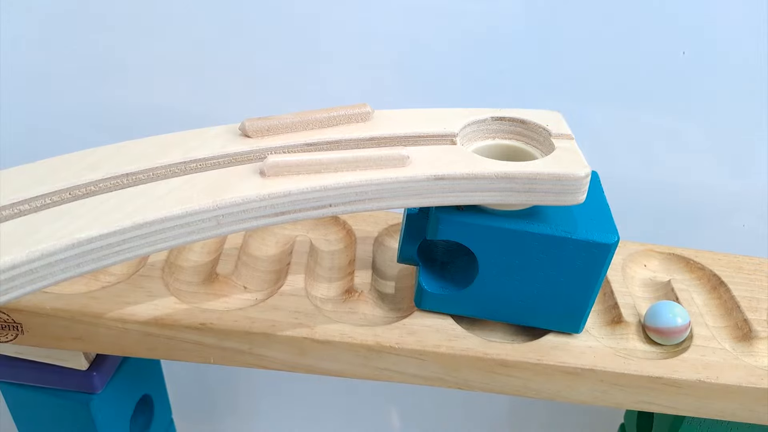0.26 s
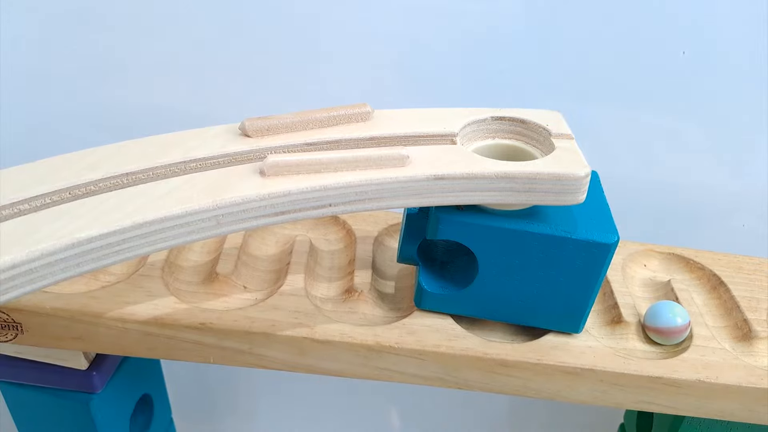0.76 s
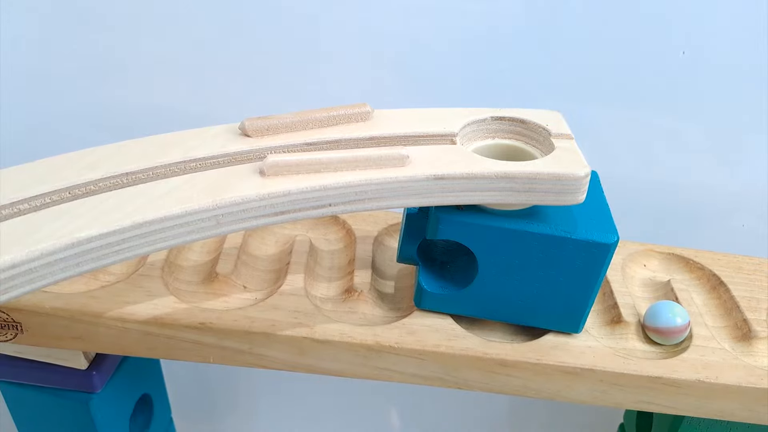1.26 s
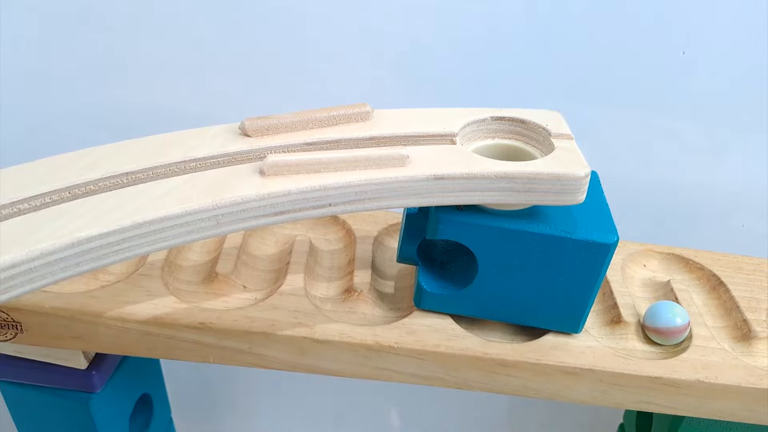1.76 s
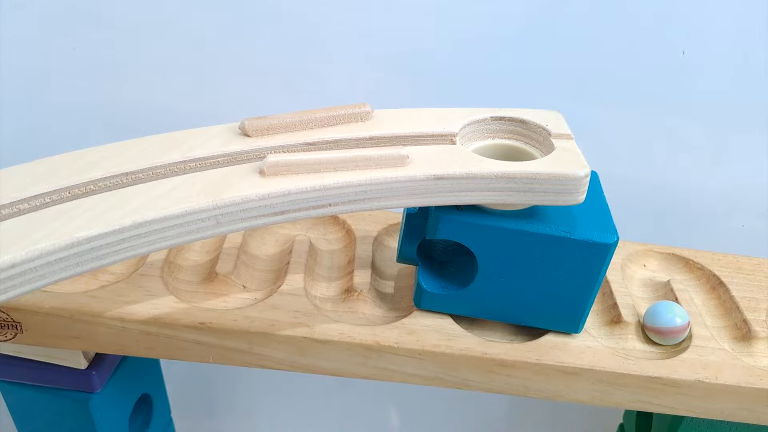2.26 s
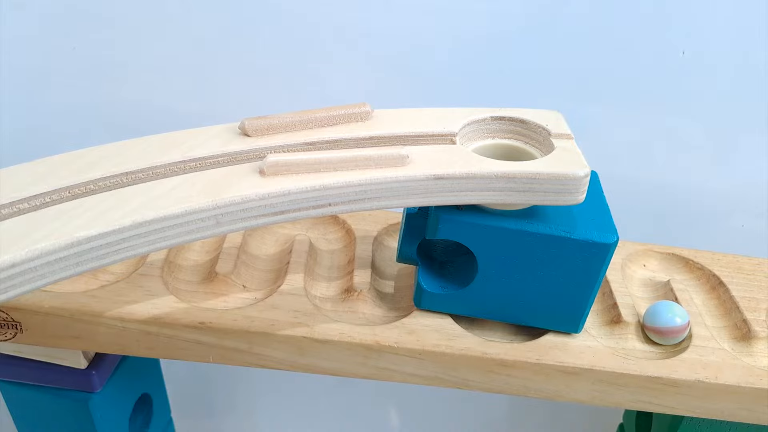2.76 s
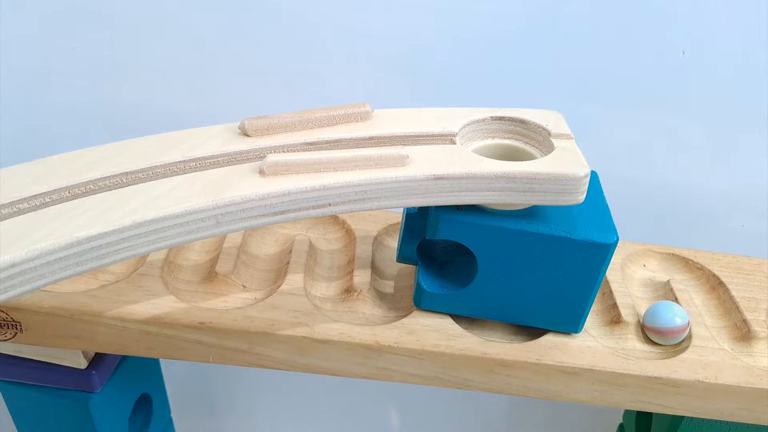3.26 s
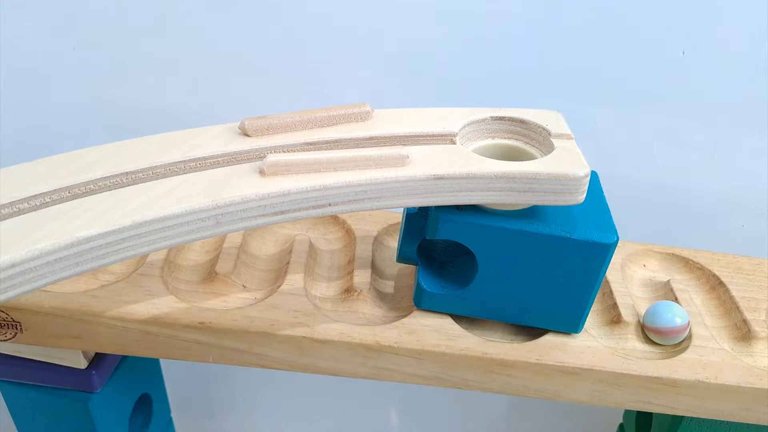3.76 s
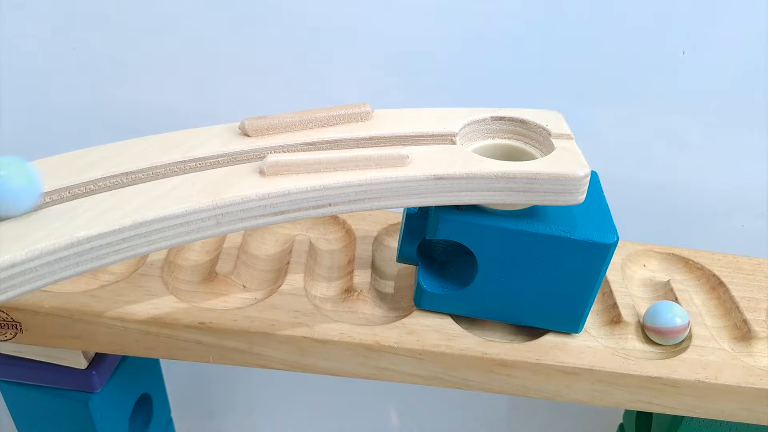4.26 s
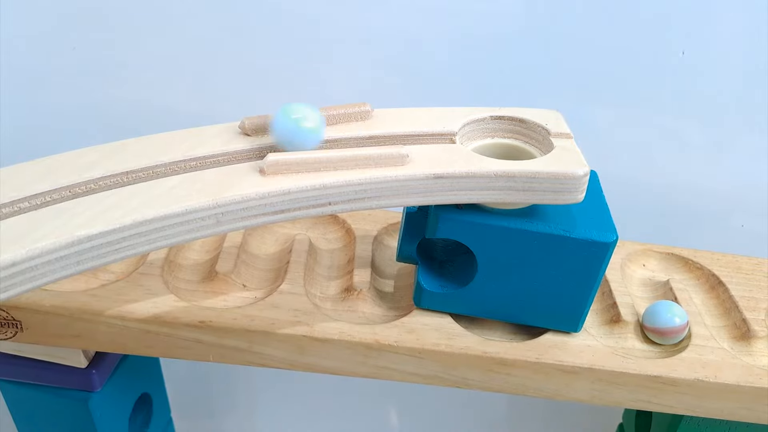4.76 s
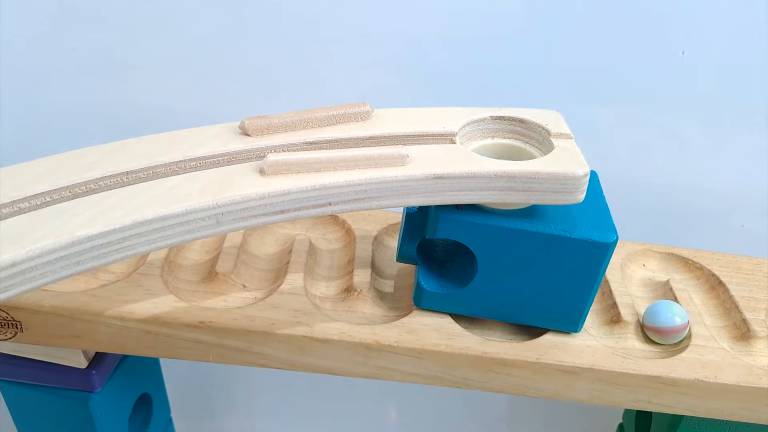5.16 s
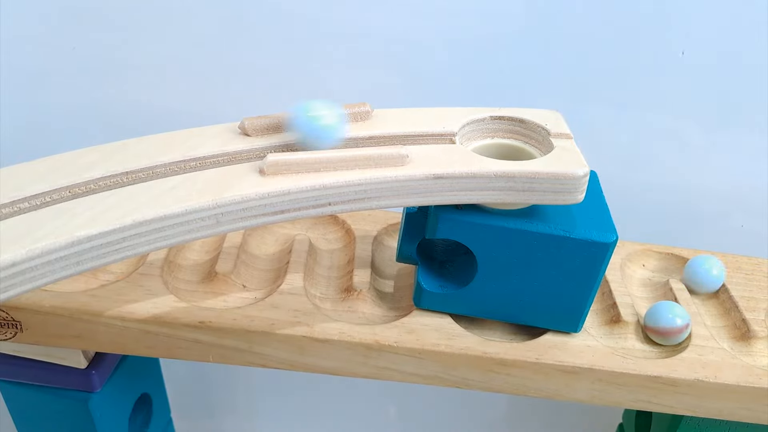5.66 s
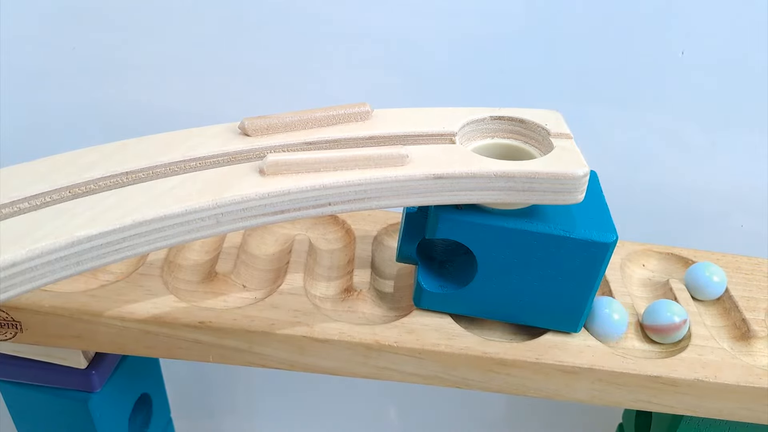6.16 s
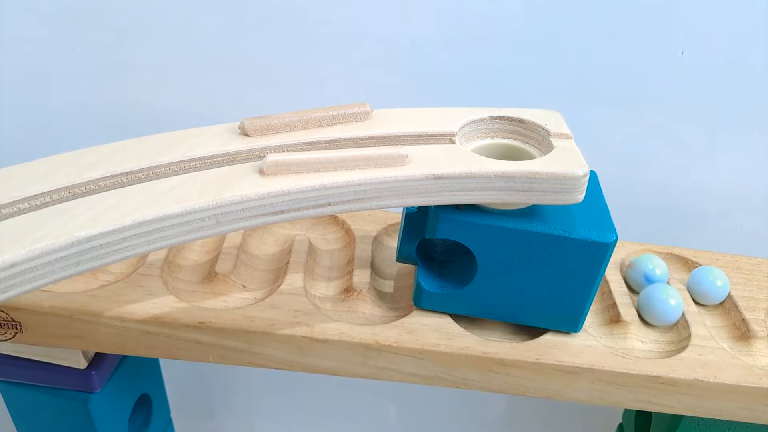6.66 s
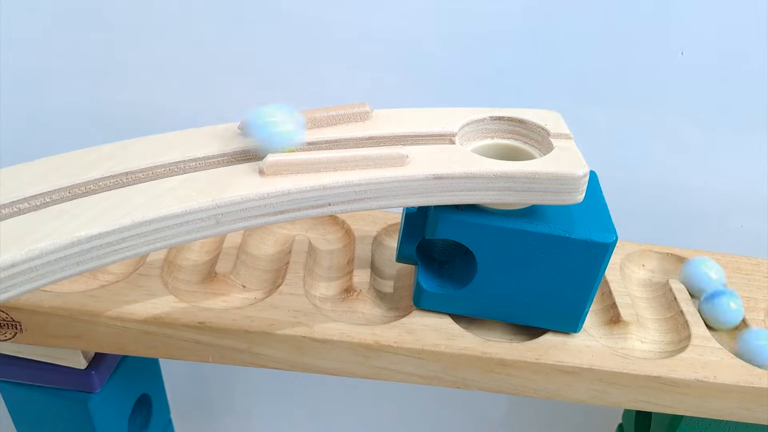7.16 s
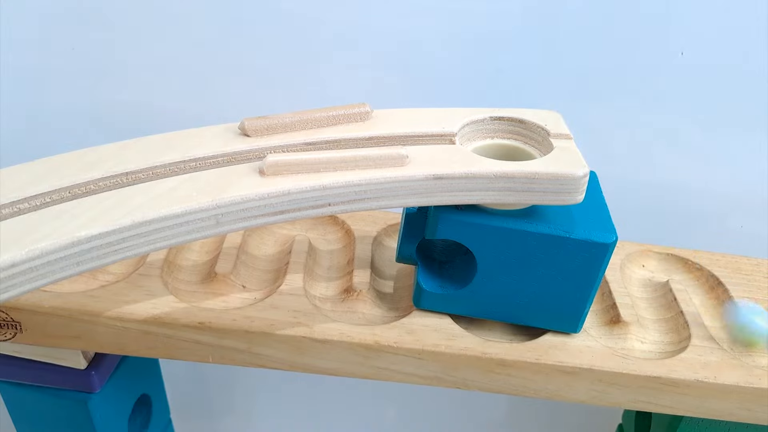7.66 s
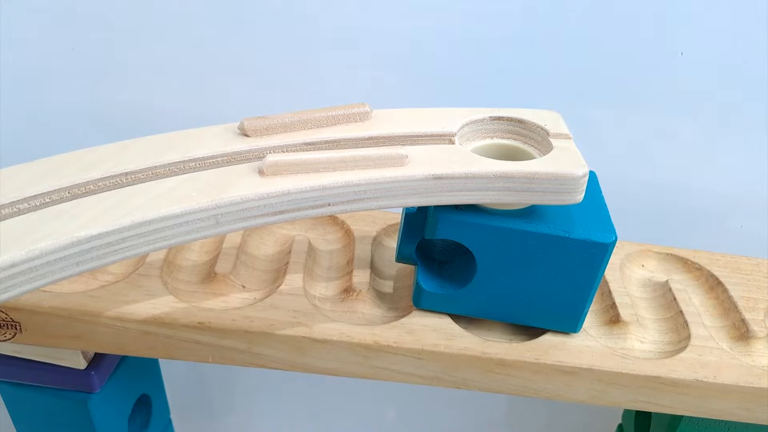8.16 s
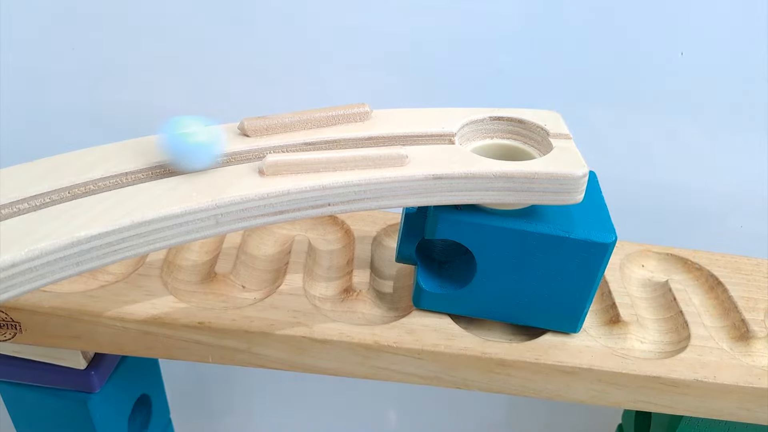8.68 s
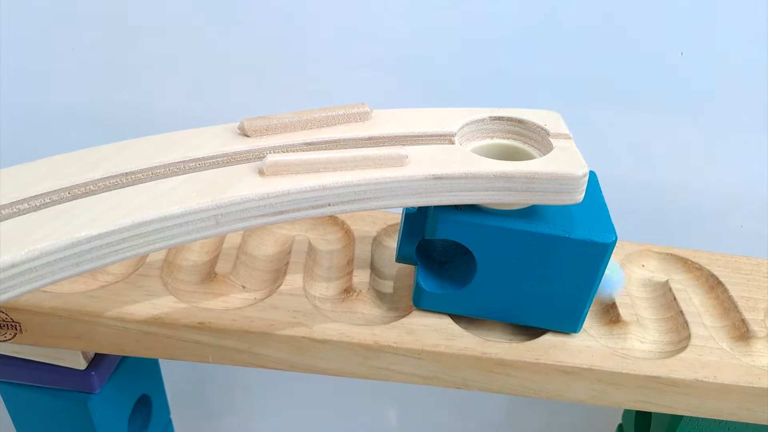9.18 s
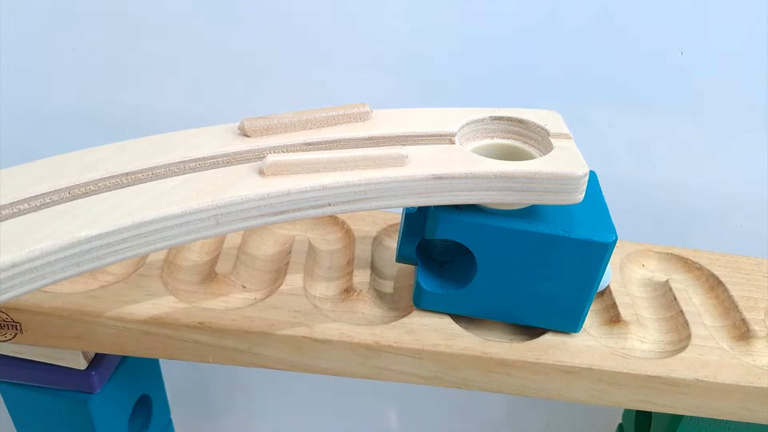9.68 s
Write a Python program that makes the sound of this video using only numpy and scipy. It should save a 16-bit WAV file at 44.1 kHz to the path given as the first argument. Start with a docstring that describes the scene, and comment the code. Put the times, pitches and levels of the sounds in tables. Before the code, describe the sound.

Bright wooden knocks, glassy clacks and grainy rolling from marbles on a wooden track, building from sparse taps to a dense rattling zigzag run.

```python
"""Sharp wooden knocks and glassy clacks, with patter between them: glass marbles run down a wooden
marble run close to a phone in a small room. Each knock rings the part it strikes, thumps the frame and ticks.
Rolling is a dense patter of tiny bumps into the same parts. Thin glass rings, two dull thuds and a short
room tail join in, over a faint hum and a low wavering drone."""
import sys
import numpy as np
from scipy import signal
from scipy.fft import rfft, irfft
from scipy.io import wavfile
from scipy.ndimage import uniform_filter1d

SR = 44100
rng = np.random.default_rng(int(sys.argv[2]) if len(sys.argv) > 2 else 0)


def generate_wav(signal):
    """Clip the signal to [-1, 1] and save it as 16-bit WAV at the path in sys.argv[1]."""
    frames = np.transpose(np.atleast_2d(signal))
    scaled = np.clip(frames, -1, 1) * 32767
    pcm = np.round(scaled).astype(np.int16)
    wavfile.write(sys.argv[1], SR, pcm)


N = 437472
T = np.arange(6144) / SR  # time axis of one blow, in seconds
LOW_HZ, MID_HZ, HIGH_HZ = 700, 1800, 4200  # borders between thump, body, ring and tick
PORT_GAP_S = 0.000423  # longest delay between the phone's two microphone ports

# The wooden parts and the heap of marbles. Each holds three things: its modes (the tones it rings with),
# the colour of its crack, and how far the crack stands over the modes in dB, before each layer's own offset.
# Each mode row: pitch in Hz, width in Hz (before sharpening), strength in dB (before scaling by width).
# Each crack row: pitch in Hz, strength in dB per Hz.
TRAY = ([(1150, 70, 3), (1310, 67, 3), (1510, 70, 4), (1740, 80, 2), (1970, 80, 1), (2080, 680, -9.5),
        (2210, 43, -22), (2666, 210, -1), (4530, 60, -29)], [(41, -37.5), (72, -16), (112, 13), (162, -13),
        (223, 13), (2540, 1), (5750, -10.5), (11400, -13), (16000, -33)], 0.68)
HEAP = ([(757, 260, -2), (931, 260, -0.5), (1250, 86, -6), (1600, 170, -9), (2690, 270, -15.5),
        (4820, 150, 6.5), (6755, 233, 6), (7940, 110, -15.5), (11200, 467, -8), (11500, 440, -19.5)],
        [(41, -53), (70, -22), (431, -4.5), (506, -3.5), (744, 1), (2370, -29.5), (6900, -16),
        (11600, -14.5), (16000, -30)], -1.3)
RAMP = ([(1080, 89, 5), (2472, 140, -11), (4890, 5000, -24)], [(41, -36), (70, -18), (344, -4.5),
        (506, -14.5), (744, -9), (892, -19), (2600, -16.5), (3910, -26.5), (11600, -36), (16000, -61)], 2)
BLOCK = ([(815, 150, -4.5), (1780, 50, -3.5), (3450, 90, -12), (5140, 70, -16), (2190, 230, -17),
         (2860, 160, 0), (3094, 68, -5), (4160, 23, -57), (4930, 460, -22), (4660, 110, -11.5),
         (6010, 64, -14), (7020, 97, -18), (7900, 33, -47)], [(41, -34), (70, -28.5), (108, 4), (431, 5),
         (529, -8.5), (779, 13), (2270, -25.5), (2840, -17), (11000, -29), (16000, -39)], -4)
ZIGZAG = ([(750, 43, 3), (1258, 21, 17), (1772, 25, 4), (2012, 23, 6), (2342, 28, 11.5), (2640, 14, 12.5),
          (2850, 32, 6), (3216, 29, 13.5), (4034, 67, 1), (4710, 54, 0), (6200, 59, -32), (6700, 26, -36),
          (8160, 34, -40)], [(41, -15), (72, 5), (122, 19), (1020, -18), (1250, -6), (1510, -20),
          (3190, -11), (11100, -26.5), (16000, -60)], -1)

# Where the marbles are. Each row: start in seconds, part they run on.
ROUTE = [(0, TRAY), (1.03, HEAP), (2.17, TRAY), (2.9, RAMP), (5.14, BLOCK), (6.42, RAMP), (7.4, BLOCK),
         (7.82, ZIGZAG), (9.0, BLOCK), (9.34, TRAY)]

# How each stretch of the route sounds. Each row: basic knock decay in seconds, left minus right in dB,
# bearing from -1 (right) to 1 (left), spread of bump sizes in dB, scatter of rolling modes in dB.
STRETCHES = [(0.048, -0.5, .2, 1, 1.5), (0.08, 0, .7, 3, 2.5), (0.11, -0.5, .9, 2.5, 0),
             (0.09, 0, .5, 2.2, 2), (0.062, -1, .6, 2.5, 1), (0.058, -0.5, .8, 2, 2.5),
             (0.11, -2, -.9, 3.5, 1.5), (0.07, -2.5, -.6, 2.5, 4.5), (0.066, -1.5, -.9, 3, 5.5),
             (0.093, -1.5, .1, 1.5, 0.5)]


def undb(db):
    """Turn decibels into a plain gain."""
    return 10 ** (np.asarray(db) / 20)


def rms(x):
    """Average strength of a signal."""
    return np.sqrt(np.mean(x ** 2))


def colour(x, points):
    """Shape the spectrum along the last axis by (Hz, dB) points."""
    hz, db = np.transpose(points)
    f = np.arange(x.shape[-1] // 2 + 1) * SR / x.shape[-1] + 1  # 1 Hz up, so that the log exists
    gain = undb(np.interp(np.log(f), np.log(hz), db))
    return irfft(rfft(x) * gain, x.shape[-1])


def fade(t60):
    """Die away by 60 dB in t60 seconds."""
    return np.exp(-np.log(1000) * T / t60)


def stretch_at(s):
    """Number of the stretch of the route at s seconds."""
    return np.searchsorted([start for start, _ in ROUTE], s, "right") - 1


def part_at(s):
    """The part the marbles run on at s seconds."""
    return ROUTE[stretch_at(s)][1]


def hum():
    """Still air and distant machines: coloured noise, its bass nearly alike at both ports."""
    # Each row: pitch in Hz, strength in dB per Hz.
    hum_colour = [(15, -50.5), (25, -17), (102, 2.5), (190, -23), (503, -18), (818, -2.5), (2050, -25),
                  (3160, -50.5), (11600, -42.5), (16000, -83.5)]
    mid_db = -56  # level of what both ports share
    mid, side = colour(rng.standard_normal((2, N)), hum_colour)
    side = colour(side, [(60, -17.5), (500, -2.5), (1500, -3.0)])
    return undb(mid_db) * np.array([mid + side, mid - side]) / rms(mid)


def drone():
    """A low wavering drone through the floor: noise squeezed into a narrow band near 48 Hz."""
    # Each row: time in seconds, level in dB.
    drone_levels = [(0, -60), (1, -57), (1.6, -63), (2.5, -66), (3.1, -57), (3.6, -54), (5, -53),
                    (7.9, -57), (9.2, -57), (9.92, -66)]
    x = colour(rng.standard_normal(N),
               [(25, -33.0), (40, -16.0), (48, 23.0), (56, -13.5), (80, -31.0), (200, -73.0)])
    level_db = np.interp(np.arange(N) / SR, *np.transpose(drone_levels))
    return undb(level_db) * x / rms(x)


def room(x):
    """A diffuse tail that builds within a few milliseconds; the treble dies first."""
    t60_s, treble_t60_s = 0.37, 0.22
    t = np.arange(int(.45 * SR)) / SR
    noise = rng.standard_normal((3, len(t)))
    low = signal.sosfilt(signal.butter(1, 1500, fs=SR, output="sos"), noise)
    bass = signal.sosfilt(signal.butter(1, 250, fs=SR, output="sos"), noise)
    slow = low - bass + .55 * bass[2]  # both ports get the same bass
    tail = slow * 1000 ** (-t / t60_s) + (noise - low) * 1000 ** (-t / treble_t60_s)
    tail = tail[:2] * (1 - np.exp(-t / 0.002))
    tail = tail / np.linalg.norm(tail, axis=1, keepdims=True)
    return signal.fftconvolve(x, tail, axes=1)[:, :N]


def glass():
    """A marble touched by another sings on thinly: a pure tone that fades."""
    # Each row: start in seconds, pitch in Hz, peak level in dB, time to fade by 60 dB in seconds.
    glass_rings = [(0.001, 5460, -57, .18), (0.001, 9900, -68, .2), (0.078, 4680, -52, .35)]
    t = np.arange(N) / SR
    out = np.zeros(N)
    for s, hz, db, t60 in glass_rings:
        envelope = (t > s) * 1000 ** (-np.abs(t - s) / t60)
        out += undb(db) * envelope * np.sin(2 * np.pi * hz * t)
    return out


def thuds():
    """A marble lands softly on solid wood: a few low cycles, gone at once."""
    # Each row: start in seconds, pitch in Hz, level in dB (before doubling and the soft start),
    # time to fade by 60 dB in seconds.
    thud_table = [(3.26, 420, -15, .02), (9.222, 600, -20, .03)]
    out = np.zeros(N + len(T))
    for s, hz, db, t60 in thud_table:
        i = int(s * SR)
        envelope = (1 - np.exp(-T / .0015)) * fade(t60)
        out[i:i + len(T)] += 2 * undb(db) * envelope * np.sin(2 * np.pi * hz * T)
    return out[:N]


def modes(table, bearing, sharp, scatter_db, spread=.3):
    """One blow on a table of modes; each fading tone reaches the two ports from its own spot."""
    hz, width, db = np.array(table, float).T[:, :, None]
    gain, detune, start, spot = rng.standard_normal((4, len(table), 1))
    f = hz + (0.22 * width + .005 * hz) * detune
    # a wide mode dies fast; a higher "sharp" makes every mode last longer
    ring = undb(db + scatter_db * gain) * width * np.exp(-np.pi * width / sharp * T)
    lag = np.pi * f * PORT_GAP_S * np.clip(bearing + spread * spot, -1, 1)
    return np.array([np.sum(ring * np.sin(2 * np.pi * f * T + 2 * start + side * lag), axis=0)
                     for side in (1, -1)])


def blow(part, spot, bright_db, bearing, t60, sharp, scatter_db):
    """Ring, thump, body and tick of one blow: clear modes over a crack of countless short ones."""
    # The wooden frame's modes. Each row: pitch in Hz, width in Hz (before sharpening),
    # strength in dB (before scaling by width).
    frame_modes = [(88, 45, -15), (116, 16, -1), (185, 18, -.6), (260, 24, -2.5), (352.3, 72, 1),
                   (439.4, 31, 1), (600, 110, -3)]
    table, outline, crack_db = part
    if spot:  # modes far from the pitch of the struck spot sound slightly weaker, by up to about 2 dB
        ping_hz = spot[0][0]
        table = [(f, width, db - 1.4 * min(abs(np.log2(f / ping_hz)), 1.5)) for f, width, db in table]
    own = modes(table, bearing, sharp, scatter_db)
    if spot:  # the ping arrives nearly in step at both ports
        own = own + modes(spot, .08 * bearing, sharp, scatter_db=1.0, spread=0.12)
    frame = modes(frame_modes, 0.65 * bearing, 0.79, scatter_db)

    outline = [(f, db + bright_db * max(np.log2(f / HIGH_HZ), 0)) for f, db in outline]
    noise = colour(rng.standard_normal((2, len(T))), outline)
    fizz = noise.copy()  # the treble of the crack differs between the ports
    share = .85  # much of the rest reaches both ports, one after the other
    delayed = np.roll(noise[0], int(bearing * PORT_GAP_S * SR))
    noise[1] = share * delayed + np.sqrt(1 - share ** 2) * noise[1]

    # Each row: band edges in Hz, clear modes, crack, factor on the decay, rise in seconds
    # (before softening), extra crack in dB. The thump comes late and stays; the tick is short.
    layers = [
        ([MID_HZ, HIGH_HZ], own, noise, 0.67, 0.00096, -1.5),  # ring
        ([70, LOW_HZ], frame, noise[:1], 1.66, 0.0048, -4),  # thump, with one crack for both ports
        ([LOW_HZ, MID_HZ], own, noise, 1.5, 0.0013, -1.5),  # body
        ([HIGH_HZ, 17000], own, fizz, 0.65, 0.00073, -1.5 + 0.89 * max(bright_db, 0)),  # tick
    ]
    soft = (t60 / 0.039) ** 0.33  # a glancing blow that lasts longer also starts more gently
    out = []
    for edges, clear, crack, stay, rise_s, more_db in layers:
        band = signal.butter(3, edges, "band", fs=SR, output="sos")
        clear = signal.sosfilt(band, clear)
        crack = signal.sosfilt(band, crack * fade(stay * t60))
        mix = clear / rms(clear) + undb(crack_db + more_db) * crack / rms(crack)
        out.append(mix * (1 - np.exp(-T / (rise_s * soft))))
    return out


def roll_levels():
    """Gains of ring, rumble, body and hiss: every spell rises, swells or sinks evenly, and dies away."""
    # Each row: start and end in seconds, then levels in dB at mid-spell of ring, frame rumble,
    # body and hiss, then the swell from start to end in dB.
    spells = [(0, 0.214, -55, -53.5, -53.5, -61, 3), (0.71, 1.0, -33, -45, -30, -38, 3),
              (1.045, 1.15, -30, -42, -27, -29, -2), (1.39, 1.545, -35, -46, -28, -36, -6),
              (1.58, 1.79, -27, -38, -23.5, -25, 0), (1.81, 1.9, -30, -42, -26, -28, -5),
              (1.9, 2.086, -54, -53.5, -48, -48.5, -23), (2.506, 2.754, -74, -58, -60, -85.5, 2),
              (2.998, 3.506, -59, -44, -46, -83.5, -4), (3.522, 3.95, -72.5, -46.5, -58, -77.5, -2),
              (4.05, 4.38, -70, -47, -55, -78, 5), (4.44, 4.82, -72, -46.5, -57, -78, -2),
              (4.85, 5.17, -50.5, -36, -44, -69, -1.5), (5.215, 5.662, -60.5, -36.5, -46, -62, -5),
              (5.698, 6.21, -54, -40.5, -47, -68, 4), (6.482, 7.423, -54, -40, -46, -70, 2.5),
              (7.522, 7.806, -32, -30.5, -31, -40, -5), (7.86, 8.59, -34, -37, -37, -49, -3.5),
              (8.638, 9, -35, -39.5, -34.5, -50, 2), (9.01, 9.438, -33, -32.5, -40.5, -49.5, 9),
              (9.56, 9.916, -35, -41.5, -34, -49, -8)]
    rise_db_per_s, fall_db_per_s = 498.5, 247.5
    t = np.arange(0, N + 64, 64) / SR  # a coarse time grid is enough
    power = 0
    for start, stop, *layers_db, swell_db in spells:
        shape_db = swell_db * (np.clip((t - start) / (stop - start), 0, 1) - .5)
        shape_db = shape_db - rise_db_per_s * np.maximum(start - t, 0)
        shape_db = shape_db - fall_db_per_s * np.maximum(t - stop, 0)
        power = power + undb(np.add.outer(layers_db, np.maximum(shape_db, -200))) ** 2
    return np.array([np.interp(np.arange(N) / SR, t, gain) for gain in np.sqrt(power)])


def rolling(per_s, stretch_s):
    """Tiny bumps in the grain of the wood; the ringing changes as a marble moves along."""
    levels = roll_levels()
    grit_db = np.array(STRETCHES)[stretch_at(np.arange(N) / SR), 3]
    size = undb(grit_db * np.minimum(rng.exponential(size=N), 4))
    size /= np.sqrt(uniform_filter1d(size ** 2, SR // 4))  # even out the slow changes in strength
    bumps = (rng.random(N) < per_s / SR) * rng.standard_normal(N) * size

    hold = int(.018 * SR)  # the marble skips over rough and smooth patches
    patches = np.repeat(rng.standard_normal(N // hold + 1), hold)
    bumps *= undb(1.5 * uniform_filter1d(patches, hold // 2)[:N])

    # cut the bumps into overlapping pieces; each piece strikes a freshly drawn blow
    step = int(stretch_s * SR)
    pushes = np.pad(bumps / rms(bumps) * levels, ((0, 0), (step, 2 * step)))
    blend = np.sin(np.pi * np.arange(2 * step) / (2 * step))
    out = np.zeros((2, N + len(T) + 3 * step))
    for i in range(0, N + step, step):
        s = min(i, N - 1) / SR
        _, _, bearing, _, scatter_db = STRETCHES[stretch_at(s)]
        layers = blow(part_at(s), [], 0, bearing, t60=0.014, sharp=0.5, scatter_db=scatter_db)
        for x, push in zip(layers, pushes):
            piece = (push[i:i + 2 * step] * blend)[None]
            y = signal.fftconvolve(piece, x / rms(x) / np.sqrt(len(T)), axes=1)
            out[:, i:i + y.shape[1]] += y
    return out[:, step:N + step]


def knocks():
    """Marbles drop, bounce and clack; the struck spot adds a short ping of its own."""
    # Each row: start in seconds, ring level in dB, then thump, body and tick in dB compared with
    # the ring, then the pitch of the ping in Hz and, on some, of a second ping in Hz.
    knock_table = [(0.078, -46, -8, -2, 2, 4610), (0.0925, -12, -18.5, -1.5, -12, 1740, 1150),
                   (0.256, -64, 0, 0, 9, 6000), (0.326, -56, 18, 18, -22, 818),
                   (0.397, -8.5, -21.5, -4.5, -15, 1730, 2630), (0.5908, -7, -25, -5, -19.5, 2560, 1500),
                   (0.6995, -13.5, -38, -7.5, -41, 2060, 2680), (0.7251, -8, -24.5, -9.5, -29, 2450, 1520),
                   (0.77, -26, -20, 2, -6, 1600), (0.815, -8, -25, -6.5, -17, 2600, 1500),
                   (0.8854, -10.5, -21, -3.5, -14.5, 1910), (0.894, -24, -20, -4, 0, 4400),
                   (0.921, -30, -20, -4, 6, 4900), (0.9412, -15.5, -35, -4, -12, 1480),
                   (0.9858, -18, -36, -10, -31, 2000), (1.0186, -17, -31, -7, -32, 2500),
                   (1.0368, -22, -33, -4, 0.5, 4800), (1.06, -28, -25, -4, 5, 4500),
                   (1.0926, -20, -4, 4.5, -8, 915), (1.165, -32, -8, 8, -4, 880),
                   (1.239, -51, 2, 15, 16, 790), (1.2742, -35, -7.5, 3, 5.5, 905),
                   (1.3715, -34, -12, 3, -13, 2540), (1.3862, -30, -26, 8, 7, 990),
                   (1.4151, -29.5, -8, 3.5, -5, 880), (1.4448, -34, -8, 0, 1, 969),
                   (1.462, -29.5, -1, 10, 4, 802), (1.477, -27.5, -10, -1, -1, 930),
                   (1.4964, -30, -4, 10, 0, 905), (1.5585, -19, -25, -2, 8, 6800, 900),
                   (1.588, -24, -22, -1, 11, 4660), (1.6051, -17, -15, -2, 6, 830),
                   (1.6463, -31, -14, 0, 9, 4600), (1.6732, -27, -14, 7, 11, 740),
                   (1.696, -29, -20, 13, 7, 760), (1.724, -27.5, -10, 10, 2, 800),
                   (1.7645, -30, -18, 6, 8, 4710), (1.7864, -22, -9, 3.5, 5, 6700),
                   (1.8327, -23, -24, 5, 1, 4710), (1.8643, -32, -17, 8, 2, 961),
                   (1.898, -32, -14, 1, 2, 900), (1.9896, -45.5, -6, 12, 7, 1690),
                   (2.1514, -65.5, 3, 7, 11, 975), (2.1961, -51.5, -4, 11, -13, 1430),
                   (2.2361, -52.5, -9, -0.5, -23, 1530), (2.255, -51, -4, 7, -3.5, 810),
                   (2.333, -56, -2, 6, -12, 1400), (2.415, -58, -2, 7, -15, 1300),
                   (2.5172, -27, -11.5, -6, -17, 2480), (2.585, -40, 0.5, -10, -15, 2320),
                   (2.7366, -44, 5, -1, -19.5, 960), (2.755, -39.5, -8, -1, -10, 2770, 4700),
                   (2.7789, -44, 2, -7, -27, 970), (3.005, -60, 0.5, 3, -18.5, 1600),
                   (3.0471, -54.5, 4, 4, -20, 1800), (3.077, -48, 0, 6, -24, 2100),
                   (3.1418, -50, -2, 5, -18, 1900), (3.1763, -50.5, 0.5, 5, -24, 2380),
                   (3.2048, -48, 2, 6, -25, 1700), (3.2581, -46, 6, 12, -20, 900),
                   (3.2695, -26, -18, 1, -22, 1750, 1020), (3.279, -29, -18, -3, -24, 2420, 1850),
                   (3.287, -30, -16, -2, -22, 2400), (3.295, -32, -8, -1, -26, 1720),
                   (3.4721, -54, 0, 0, -9, 2700), (3.5083, -31, -11, -24, 13, 5010),
                   (3.6066, -31.5, -19, -22, -4, 2600), (3.6299, -27.5, -10.5, -20, -11, 2770),
                   (3.648, -45, -7, -12, -1, 2370), (3.741, -33, -1.5, -6, -17, 3040),
                   (3.7763, -36.5, -2, 0, -14, 802), (3.8005, -38.5, 4.5, 0.5, -10.5, 980),
                   (4.401, -43.5, -8, 6, -24.5, 970), (4.5118, -51, -3.5, 9, -20, 840),
                   (4.536, -48.5, -1, 2.5, -21, 855), (4.8528, -50.5, 3, -2, -16, 1200),
                   (5.1521, -21, -13.5, -13, -12, 2470), (5.1711, -11.5, -6, -7, -9, 2840, 750),
                   (5.1817, -12.5, -7.5, -21, -0.5, 3410), (5.2052, -23.5, 2, -3, -15, 818),
                   (5.2649, -14, -2.5, -18, -4, 5130), (5.2802, -24, -14, -6, -13, 2370),
                   (5.3246, -24, 3, -13, -7, 810), (5.3705, -7.5, -14.5, -24, -14, 2900, 3150),
                   (5.447, -9.5, -13, -26, -18, 2950, 3200), (5.5072, -7, -14, -6, -16, 2800, 3600),
                   (5.5662, -17, -6.5, -2.5, -17, 2780, 3630), (5.6261, -34, -2, 7, -32, 806),
                   (5.6893, -29.5, -4, 2, -33, 3080), (5.7548, -46, 4, 4, -32, 870),
                   (5.8052, -22.5, -18, 3.5, -6.5, 765), (5.8785, -5.5, -39, -11, -7.5, 3030),
                   (5.8874, -21, 4.5, -14, -8, 3430), (5.9007, -20.5, 0.5, -13, 5.5, 3920, 4370),
                   (5.9817, -14, -6, -21, -3, 5150, 6010), (5.991, -22, -25, -9, -2, 5130),
                   (6.0523, -34, -23, -21, 5, 3960), (6.07, -8.5, -13.5, -17, -19, 3070, 2780),
                   (6.153, -10, -14.5, -9.5, -16.5, 3110, 2810), (6.1969, -21.5, -8, -20, -21, 1670),
                   (6.336, -61.5, 16, -28, 25, 6550), (6.3714, -64.5, 9.5, -7, 24, 6440),
                   (6.5048, -50.5, 6, -10, 7, 855), (6.7374, -30, -17, -18, -9.5, 2820),
                   (6.7552, -21.5, -23, -20, -7, 2200), (6.789, -25, -4.5, -6, -12, 3060),
                   (6.8604, -24.5, -7, -4, -17, 2430), (6.883, -29.5, 1, -8, 3, 3360),
                   (6.999, -31, -3, -25, -17.5, 1980), (7.14, -40.5, 3, -6, -14, 1090),
                   (7.2255, -43.5, -5, -14, 11, 6100), (7.2463, -34.5, -7, -11, -28, 2380),
                   (7.362, -36.5, -12, 6, -32, 805), (7.414, -8, -10.5, -15, -4, 3025),
                   (7.5049, -12.5, -3.5, -10, -2.5, 6000, 5100), (7.586, -12, -18, -15, -15, 2900),
                   (7.593, -6, -18, -12, -16, 3010), (7.601, -9, -18, -15, -12, 3250),
                   (7.6635, -10, -17, -7.5, -13, 3240), (7.678, -15, -17, -20, -8, 4650),
                   (7.6891, -10, -13, -29, -12, 3100, 3450), (7.7014, -8.5, -28, -20, -11, 3300),
                   (7.7364, -15, -10, -3, -11, 1500, 3000), (7.745, -18, -12, -3, -12, 1750),
                   (7.7649, -14.5, -31, -7, -9, 2750), (7.788, -24, -10, -8, -3, 3200),
                   (7.84, -26, -15, -12, -20, 2900), (7.864, -18, -18, -14, -12, 3300),
                   (7.8704, -8.5, -19, -15, -15, 3110, 4010), (7.926, -11, -16, -9.5, -16, 3150),
                   (7.9411, -9.5, -12.5, -8, -19, 3080), (7.9793, -16, -23, -14, -15, 2720),
                   (8.0058, -15, -13, -23, -13.5, 2750), (8.0385, -16.5, -11, -10.5, -19, 2700),
                   (8.091, -8.5, -13, -7, -11, 2800, 3270), (8.05, -24, -20, 0, -22, 1258),
                   (8.148, -26, -16, 3, -22, 1258), (8.167, -18.5, -16, -10, -23, 3200),
                   (8.198, -23, -24, -13, -22, 3200), (8.214, -14, -14, -23, -23, 2890, 3260),
                   (8.245, -12.5, -16, -21, -8, 2900, 2310), (8.27, -19, -17, -3, -18, 2650),
                   (8.297, -19.5, -26, -20, -15, 3370), (8.3114, -15.5, -14, -6.5, -19, 3200),
                   (8.3656, -20, -8.5, -3, -17, 3240), (8.4002, -17.5, -19, -7, -20, 2380),
                   (8.4291, -17, -27, -6, -28, 3060), (8.4947, -19, -13, -26, -34, 2300),
                   (8.517, -22.5, -20, -23, -30, 2330), (8.545, -28, -20, 5, -20, 1258),
                   (8.5525, -19, -24, -12, -18, 2700), (8.6273, -15.5, -24, -12, -21, 2680, 4040),
                   (8.6538, -20, -11, -18, -22, 3180), (8.681, -14.5, -28, -20, -23, 2470),
                   (8.7061, -18, -19, -21, -23, 2700), (8.759, -17, -25, -20, -14, 3300, 2700),
                   (8.7665, -12, -47, -22, -16, 2340, 3260), (8.812, -24, -15, -12, -18, 2700),
                   (8.826, -25, -15, -20, -10, 4000), (8.8354, -20.5, -13, -19, -15, 2320),
                   (8.8856, -28, -18, -26, -20, 2360), (8.924, -23, -18, -18, -12, 4000, 2300),
                   (8.9429, -18.5, -13, -16, -12, 2320), (8.9608, -16, -11.5, -20, -20, 2240),
                   (8.988, -20, -11, -13, -18, 2150), (9.0059, -10, -11.5, -23, -12, 3450, 2150),
                   (9.0431, -7.5, -11, -23, -7, 2950, 4390), (9.053, -20, 3, 4, -12, 800),
                   (9.063, -17, -8, -6, -8, 3300), (9.075, -15, -3, -5, -9, 2110, 3130),
                   (9.102, -18, -12, -18, -23, 3320), (9.122, -19, -27, -13, -15, 2240),
                   (9.1416, -16.5, -9, -18, -7, 5100), (9.157, -21.5, -18, -18, -18, 2200),
                   (9.187, -20, -16, -23, -23, 3260), (9.212, -32, -2, -5, 0, 5120),
                   (9.2219, -24.5, 8.5, 7, -14, 620), (9.234, -30, 9.5, 14.5, -20, 860),
                   (9.2525, -8, -12, -13, -35, 3010, 1780), (9.2998, -13, -29, -18, -18, 3450, 2120),
                   (9.3222, -13.5, -16, -7, -15, 3140), (9.33, -22, -18, -17, 0.5, 5070),
                   (9.353, -8.5, -14, -2, -14.5, 2330, 810), (9.373, -9.5, -16, -3, -15.5, 2610, 800),
                   (9.39, -15, -14, -2, -16, 2200), (9.41, -18, -14, 0, -16, 1300),
                   (9.428, -20, -14, -3, -18, 2300), (9.4666, -21.5, -15, -34, -18, 2220),
                   (9.5273, -18.5, -17, -14, -15, 2180, 3400), (9.556, -8, -16, -4, -19.5, 840, 1430),
                   (9.572, -12, -16, -4, -15, 3000, 900), (9.59, -18, -14, 0, -16, 1500),
                   (9.6624, -22.5, -5.5, 3, -19, 2480), (9.7022, -10, -21, -2.5, -22, 1520),
                   (9.7803, -5, -20.5, -4.5, -18, 2490), (9.8118, -17.5, -15, 2.5, -11.5, 1290),
                   (9.874, -23, -18, -3, -27, 1950), (9.891, -13.5, -28, -4, -20, 1860)]
    head = SR // 100  # each layer's level is set over its first 10 ms
    out = np.zeros((2, N + len(T)))
    for s, db, thump_db, body_db, tick_db, *pings_hz in knock_table:
        t60, pan_db, bearing, _, _ = STRETCHES[stretch_at(s)]
        pan_db = pan_db + 0.5 * rng.standard_normal()
        # glass on glass ticks loudly and far into the treble
        bright_db = .5 * np.clip(tick_db - 6.5, -8, 25)
        spot = [(hz, 155, 11.5 - 3 * k) for k, hz in enumerate(pings_hz)]
        layers = blow(part_at(s), spot, bright_db, bearing, t60, sharp=12 * t60, scatter_db=3.5)
        hit = sum(undb(db + rel) * x / rms(x[:, :head])
                  for x, rel in zip(layers, (0, thump_db, body_db, tick_db)))
        i = int(s * SR)
        out[:, i:i + len(T)] += hit / np.sqrt(2) * undb([[pan_db / 2], [-pan_db / 2]])
    return out[:, :N]


def scene():
    """The marbles and their room tail over the hum and the drone."""
    run = knocks() + rolling(per_s=2500, stretch_s=.06) + glass() + thuds()
    room_db = -5.5
    return run + undb(room_db) * room(run) + hum() + drone()


def record(dry):
    """The two ports differ in tone; the phone rounds the loudest peaks and cuts the top."""
    # Each row: pitch in Hz, left minus right in dB.
    port_tone = [(60, 1), (1500, 2), (4400, -2.5), (8000, -.8), (11000, -12), (13000, 3), (15000, 2.5)]
    ports = np.array([colour(x, [(f, side * db / 2) for f, db in port_tone])
                      for x, side in zip(dry, (1, -1))])
    top_cut = signal.ellip(10, .2, 90, 16300, fs=SR, output="sos")  # nothing much above 16300 Hz
    return signal.sosfilt(top_cut, np.tanh(0.8 * ports) / 0.93)


dry = scene()
out = record(dry)
generate_wav(out)
```